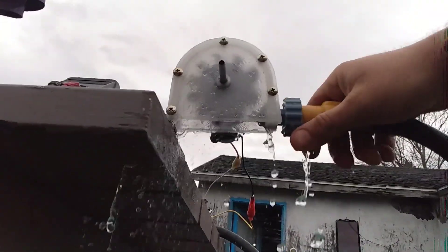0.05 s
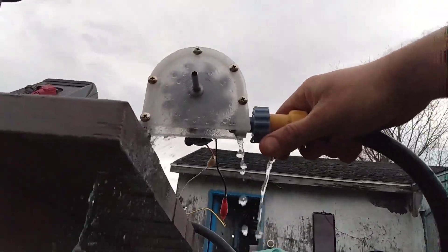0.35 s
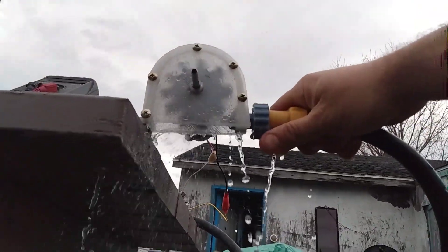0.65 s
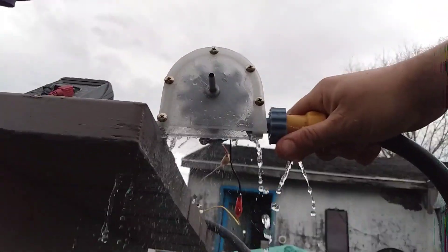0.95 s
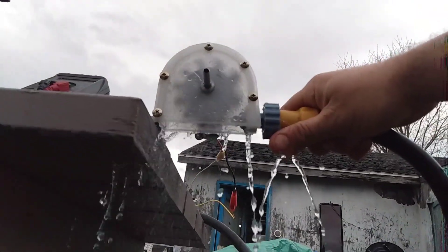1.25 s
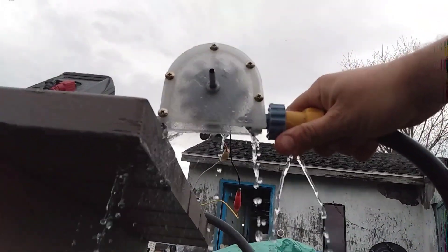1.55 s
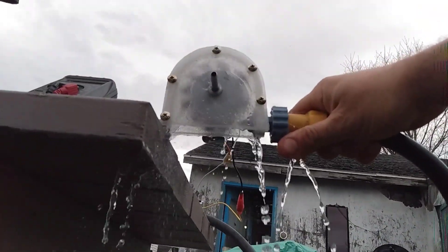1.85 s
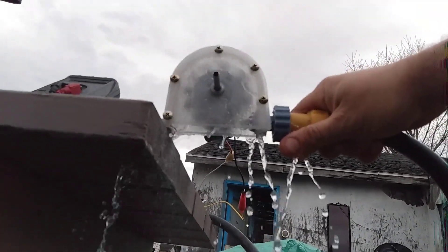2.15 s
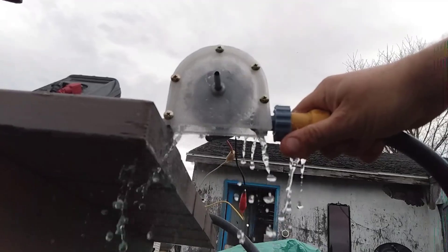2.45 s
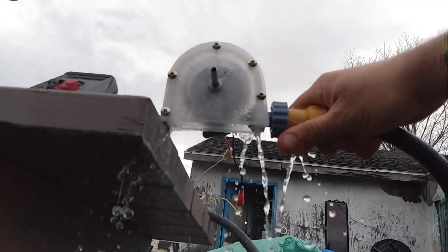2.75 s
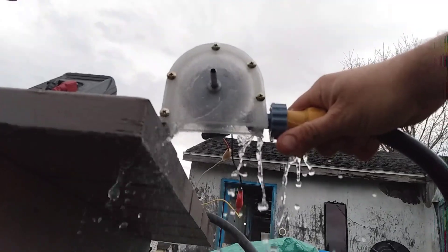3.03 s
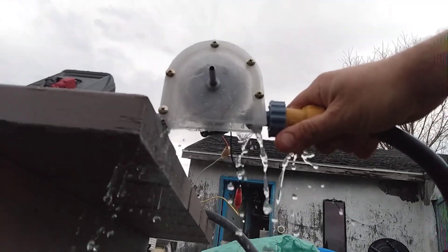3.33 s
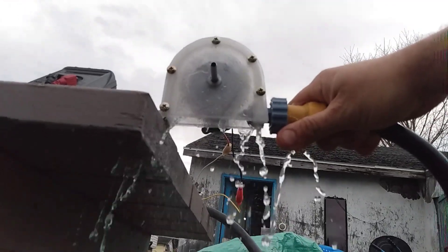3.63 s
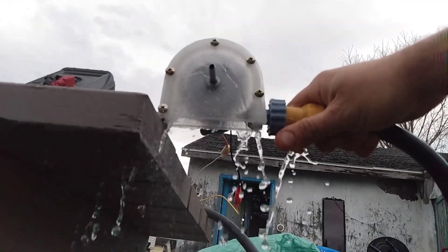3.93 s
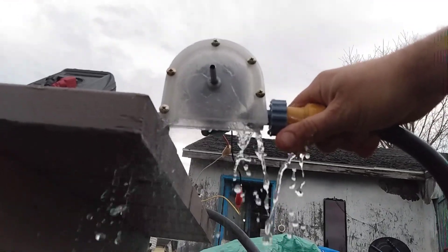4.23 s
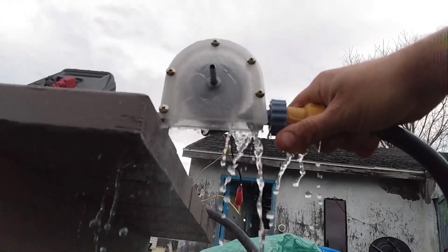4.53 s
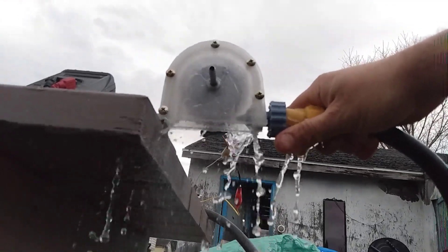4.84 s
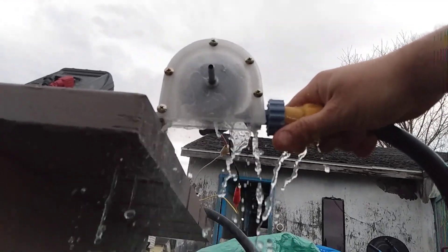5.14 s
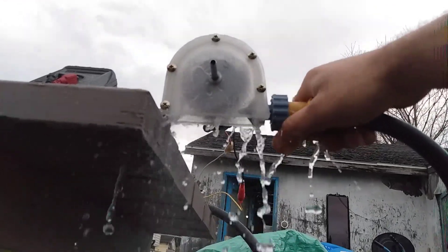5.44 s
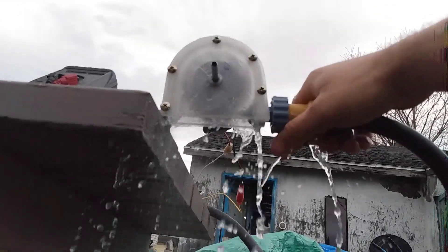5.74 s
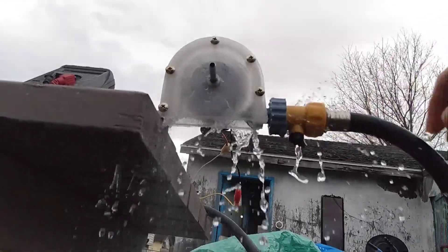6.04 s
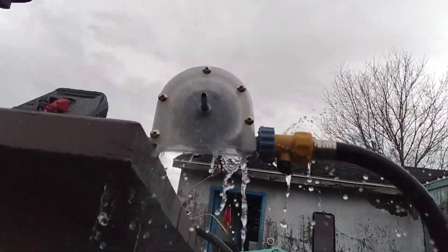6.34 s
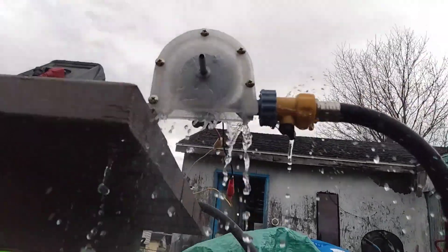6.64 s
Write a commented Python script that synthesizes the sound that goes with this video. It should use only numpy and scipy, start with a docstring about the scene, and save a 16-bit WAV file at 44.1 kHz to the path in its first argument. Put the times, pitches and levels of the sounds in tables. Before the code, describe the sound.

Water from a hose hisses inside a small plastic turbine, close to the microphone in the open air. The wheel chatters and scrapes against its housing, gathering speed in stages until it settles into a fast, whining rattle with a faint generator hum. The spray grows along with it, while scattered drops splat nearby and a few soft puffs of wind brush the microphone.

```python
"""A small water turbine in a plastic housing spins up on a hose jet, outdoors and close by.
Its loose rotor knocks once a turn, whirls through its critical speed, then rattles until the
housing's resonances sing near 1 kHz. The generator's brushes tick and its poles hum with the shaft.
Spray hisses inside, wind rumbles faintly, and spilled water spatters below."""
import sys
import numpy as np
from scipy import signal
from scipy.fft import rfft, irfft
from scipy.io import wavfile
from scipy.ndimage import uniform_filter1d

SR = 44100
rng = np.random.default_rng(int(sys.argv[2]) if len(sys.argv) > 2 else 0)


def pcm_store(signal):
    """Save signal as 16-bit PCM."""
    levels = np.round(np.clip(np.atleast_2d(signal), -1, 1) * 32767)
    wavfile.write(sys.argv[1], SR, levels.astype(np.int16).T)


N = 298998
TIME = np.arange(N) / SR

# Shaft speed. Each row: time in seconds, turns per second.
SHAFT_SPEED = [(0, 23.91), (.53, 23.62), (.75, 19.48), (1.16, 28.89), (1.52, 33.39), (1.8, 35.25),
               (2.3, 42.37), (2.57, 47.46), (2.95, 50.11), (3.9, 48.16), (4.18, 48.75), (4.61, 63.11),
               (6.21, 66.96), (6.78, 67.15)]
# Rotor wobble. Each row: turns per second, side blow, opposite blow and looseness, each from 0 to 1.
ROTOR_WOBBLE = [(25, 0.1, 0.11, 0.06), (33.5, 0.18, 0.09, .16), (41.5, 0, 0.13, .16),
                (49.1, 0.2, 0.28, 0.43), (54.2, 0, 0.4, .95), (63.7, .8, 0.72, .5),
                (67.13, 0.7, 0.97, 0.83)]
# Period doubling: at speed the wobble repeats every second turn. Each row: time in seconds, share.
PERIOD_DOUBLING = [(4.2, .05), (4.7, .9)]
# The rotor runs almost clear of the wall. Each row: centre and half length in seconds, knock gain in dB.
CLEAR_RUNS = [(.362, 0.013, -14), (.76, 0.073, -3), (.89, 0.029, -7.5), (2.48, .05, -3), (3.39, 0.028, -7),
              (3.6, .04, -1.5), (3.98, 0.046, -3), (4.22, .035, -4)]
# Resonances of the housing, dry cover, wheel and generator can.
# Each row: frequency in Hz, nominal width in Hz, relative levels left and right in dB.
HOUSING_MODES = [(358, 99, -21, -22.5), (560, 160, -22, -22.5), (782, 218, -14, -14.5), (941.6, 105, 2, 1),
                 (1037, 84, 0, -0.5), (1095.5, 105, -2.5, -2), (1319, 225, -16, -13.5),
                 (1632, 290, -16.5, -17.5), (1880, 360, -14.5, -29.5), (2544, 840, -24.5, -26)]
DRY_COVER_MODES = [(1133, 105, 3.7, 8.6)]
WHEEL_MODES = [(507, 300, -11.5, -19), (1270, 426, -0.5, -3), (1586, 270, -6.5, -22.5),
               (2015, 400, -0.5, -7), (2389, 260, 4, -6.5), (2693, 176, -1, -6), (3231, 550, -10.5, -9),
               (4600, 1730, -14.5, -14)]
CAN_MODES = [(4710, 47, -15, 4.4), (4930, 200, 4.5, 1.5), (5207, 186, -8, 6.1)]
# A water film damps the cover's ring. Each row: time in seconds, wet share.
COVER_WETNESS = [(1.9, 0.83), (2.6, 0.8), (4.1, 0.73), (4.6, 0.95)]
# Phase of the ringing parts. Each row: frequency in Hz, lead of left over right in radians.
LEFT_LEAD = [(150, -4), (500, 1.4), (1000, 0.7563), (1700, 0.81), (2100, 1.6), (2700, 0.07), (3200, 2.5),
             (5000, 1.85)]
# Radiation of the frame. Each row: frequency in Hz, gain in dB.
FRAME_RESPONSE = [(60, -37), (130, -21), (190, -6.5), (260, -10), (320, -2), (395, 2), (450, -1),
                  (530, -3.5), (680, -2), (790, 1.5), (950, -10)]
# Spectra of the spray and the wind. Each row: frequency in Hz, relative level in dB.
SPRAY_SPECTRUM = [(150, -28), (400, 11), (1500, 5.5), (3700, -2.5), (5600, -1.5), (6600, 2), (8300, 0.5),
                  (10000, 2.5), (11800, 3.5), (13200, -2), (14700, -0.5), (15800, -8)]
WIND_SPECTRUM = [(15, -18), (30, -6), (50, -4), (100, 0.5), (160, 0.5), (240, -7), (500, -3.5), (2000, -39)]
# Direction of the spray. Each row: frequency in Hz, left minus right in dB.
SPRAY_BALANCE = [(3000, -3.5), (5500, 5), (6800, 7.5), (8500, 0.5), (10000, -2), (12500, 8), (14000, 3.5),
                 (15500, 1)]
# Puffs of wind. Each row: centre in seconds, half length in seconds, level in dB.
WIND_PUFFS = [(.12, 0.14, -50), (.66, 0.14, -45), (1.38, 0.044, -46), (3.499, 0.064, -50), (3.9, 0.11, -53),
              (4.65, 0.13, -56), (6.55, 0.14, -61)]
# Large drops. Each row: start in seconds, relative peak in dB, ring in Hz, left minus right in dB.
LARGE_DROPS = [(0.031, -24, 7880, 1), (0.237, -25.5, 3980, -1), (.411, -25.5, 5000, -4),
               (1.134, -31, 6000, -3), (2.6643, -22, 9450, 0), (2.705, -22, 5160, 5), (3.654, -30, 7200, 4),
               (4.7421, -24, 5500, 0), (5.104, -19, 5560, 3), (5.2647, -17, 6260, 1),
               (5.406, -18, 10900, -4), (5.863, -20, 5270, 5), (6.0556, -21, 9000, 3),
               (6.194, -20, 4900, 0)]

CRUISE, CRITICAL, WHIRL_RANGE, BRUSH_CHATTER = 50, 42, 2.1, 29.5  # turns per second
ROCK_END_S = .55  # the rotor rocks until then
LOOSEN_S, LET_GO_S = (5.35, 5.85), (5.85, 6.1)  # the hand on the turbine loosens, then lets go
# Added to side blow, opposite blow and looseness while the rotor whirls or rocks.
WHIRL_WOBBLE, ROCK_WOBBLE = (0.22, 0.5, 0.13), (0.51, 0.1, 0.075)
# Gain laws. Each gives dB at cruise, per doubling of speed, added in the whirl, above it, once let go.
KNOCK_LAW = (-14.5, 7, -1, -5, -2)
SCRAPE_LAW = (-25.5, 7, 2.5, -3, 0)
TICK_LAW = (-33, 12.5, -2.5, -7, -.5)
WHIRR_LAW = (-48.5, 6.5, 3, 0, 0.5)
HUM_LAW = (-59, 8.5, 8, 0, -1)


def gain_of(db):
    """Amplitude ratio of a level in decibels."""
    return 10 ** (np.asarray(db) / 20)


def unit_rms(x):
    """Normalisation to an rms of 1."""
    return x / np.sqrt(np.mean(x ** 2) + 1e-20)


def smoothed(x, first, second):
    """Low-pass filtering by two moving averages, with lengths in samples."""
    return uniform_filter1d(uniform_filter1d(x, first), second)


def steadied(x):
    """Division by the running rms holds the slow level of a stereo sound at 1."""
    power = smoothed((x ** 2).mean(0), 6000, 3000)
    return x / np.sqrt(abs(power) + 1e-20)


def curves(rows, at=TIME):
    """Linear interpolation of each later column against the first."""
    axis, *columns = np.transpose(rows)
    return [np.interp(at, axis, column) for column in columns]


def ramp(x, ends):
    """Linear rise from 0 to 1 between two ends."""
    return np.clip((x - ends[0]) / (ends[1] - ends[0]), 0, 1)


def swells(rows):
    """A sum of Gaussian pulses."""
    return sum(height * np.exp(-((TIME - s) / half) ** 2) for s, half, height in rows)


def spectrum_at(points, hz):
    """Interpolation on a logarithmic frequency axis."""
    f, value = np.transpose(points)
    return np.interp(np.log(hz + 1), np.log(f + 1), value)


def coloured(x, points):
    """Zero-phase filtering by a spectrum in dB."""
    return irfft(rfft(x) * gain_of(spectrum_at(points, np.fft.rfftfreq(N, 1 / SR))), N)


def drift(hz):
    """Low-pass noise: a random fluctuation of rms 1, up to about hz."""
    rolloff = 1 + (np.fft.rfftfreq(N, 1 / SR) / hz) ** 4
    return unit_rms(irfft(rfft(rng.standard_normal(N)) / rolloff, N))


def clicks(s, size):
    """An impulse train with the given sizes at the times s."""
    at = np.round(s * SR).astype(int)
    inside = (at >= 0) & (at < N)
    return np.bincount(at[inside], size[inside], N)


def patter(per_s, spread_db):
    """A Poisson process of impacts, most small and a few large."""
    size = gain_of(spread_db * np.minimum(rng.exponential(1, N), 5)) * rng.choice([-1, 1], N)
    return size * (rng.random(N) < per_s / SR)


def ring(force, modes, steep, size=4096):
    """Resonance: a force drives the modes' minimum-phase response, shifted in phase on the right."""
    hz = abs(np.fft.fftfreq(size, 1 / SR))
    bins, margin = size // 2 + 1, size // 16
    power = sum(gain_of([[left], [right]]) ** 2 / (1 + (2 * (hz - f) / width) ** 2) ** steep
                for f, width, left, right in modes)
    log_magnitude = np.log(power + 1e-9) / 2
    response = np.exp(np.conj(signal.hilbert(log_magnitude)))[:, :bins]
    response[1] *= np.exp(-1j * spectrum_at(LEFT_LEAD, hz[:bins]))
    taps = np.roll(irfft(response), margin, axis=1)
    return signal.oaconvolve(force[None], taps, axes=1)[:, margin:][:, :N]


def reverberant(x, wet_db, t60, shared=0, size=8000):
    """Reflections from table and walls decay exponentially; a share is common to left and right."""
    t = np.arange(size) / SR
    taps = rng.standard_normal((3, size)) * (rng.random((3, size)) < .1)
    taps *= gain_of(-60 * t / t60) * (t > .002)
    taps = np.sqrt(shared) * taps[2] + np.sqrt(1 - shared) * taps[:2]
    taps /= np.linalg.norm(taps, axis=1, keepdims=True)
    return x + gain_of(wet_db) * signal.oaconvolve(x, taps, axes=1)[:, :N]


def shaft_speed(t=TIME):
    """Rotation frequency in turns per second."""
    return curves(SHAFT_SPEED, t)[0]


def passes(turns, angle):
    """Rotation brings the shaft past an angle, given in turns, at these times."""
    return np.interp(np.arange(int(turns[-1])) + angle, turns, TIME)


def whirling(speed):
    """Shaft resonance: the whirl, from 0 to 1, peaks at the critical speed."""
    return 1 / (1 + ((speed - CRITICAL) / WHIRL_RANGE) ** 8)


def law_db(law):
    """A power law of speed, offset by the whirl, self-centring above it and the hand's release."""
    cruise_db, slope_db, whirl_db, centred_db, free_db = law
    speed = shaft_speed()
    centred = ramp(speed - CRITICAL - WHIRL_RANGE, (-.5, .5))
    return (cruise_db + slope_db * np.log2(speed / CRUISE) + whirl_db * whirling(speed)
            + centred_db * centred + free_db * ramp(TIME, LET_GO_S))


def wobble(t):
    """Speed, whirl and early rocking add up to set the side blow, opposite blow and looseness."""
    speed = shaft_speed(t)
    whirl = np.outer(WHIRL_WOBBLE, whirling(speed))
    rocking = np.outer(ROCK_WOBBLE, t < ROCK_END_S)
    return np.array(curves(ROTOR_WOBBLE, speed)) + whirl + rocking


def rotor_blows(turns):
    """Impact and rebound at up to three angles a turn; looseness scatters their timing and force."""
    out = np.zeros((3, N))
    for k, angle in enumerate([0, .75, .59]):  # main, side and opposite blow
        s = passes(turns, angle)
        side, opposite, loose = wobble(s)
        time_jitter, force_jitter, gap_jitter, rebound_jitter = rng.standard_normal((4, len(s)))
        alternation = curves(PERIOD_DOUBLING, s)[0] * (-1) ** np.arange(len(s))
        s = s + 0.00157 * loose * time_jitter + .0009 * alternation
        size = [1, side, opposite][k] * gain_of((1 + 1.33 * loose) * force_jitter + 0.5 * alternation)
        rebound_s = .0052 + (0.00029 + .001 * loose) * gap_jitter
        out[k] = clicks(s, size) + clicks(s + rebound_s, 0.56 * size * gain_of(2.6 * rebound_jitter))
    return out


def housing_knocks(impacts):
    """Impacts excite the housing's modes; a water film damps the cover's mode."""
    wet = curves(COVER_WETNESS)[0]
    damped = ring(impacts * wet, HOUSING_MODES, steep=2.44)
    undamped = ring(impacts * (1 - wet), HOUSING_MODES + DRY_COVER_MODES, steep=2.42)
    return steadied(damped + undamped)


def wheel_scrape(impacts, side):
    """Friction: the wet wheel rubs the wall, hardest around each blow, and rings in its own modes."""
    contact = unit_rms(smoothed(abs(impacts), 480, 300))
    grit = unit_rms(patter(per_s=4000, spread_db=3.43)) * (0.17 + contact)
    glancing = unit_rms(impacts + 0.83 * side)  # side blows sound harder and brighter
    return steadied(ring(unit_rms(grit) + 0.36 * glancing, WHEEL_MODES, steep=2.64))


def rotor_rattle(turns):
    """Intermittent contact: the loose rotor's impacts drive both the knocking and the scraping."""
    lull_db, uneven_db = swells(CLEAR_RUNS), 1.13 * drift(2)
    knock_db = law_db(KNOCK_LAW) + lull_db + uneven_db
    scrape_db = law_db(SCRAPE_LAW) + 0.48 * lull_db + uneven_db - 1.5 * (TIME < ROCK_END_S)
    main, side, opposite = rotor_blows(turns)
    looseness = wobble(TIME)[2]
    impacts = main + side + opposite + 0.38 * looseness * patter(per_s=260, spread_db=2.83)
    knocks = gain_of(knock_db) * housing_knocks(impacts)
    scrape = gain_of(scrape_db) * wheel_scrape(impacts, side)
    return (reverberant(knocks, wet_db=-16, t60=.08, shared=.7)
            + reverberant(scrape, wet_db=-10, t60=.06, shared=.3))


def brush_ticks(turns):
    """Sliding contact: the brushes scratch six times a turn, unevenly, and ring the metal can."""
    ticks = np.zeros(N)
    for k, strength in enumerate([1.0, 0.39, 0.86, 0.038, 0.4, 0.58]):
        s = passes(turns, k / 6)
        ticks += clicks(s, strength * gain_of(4.8 * rng.standard_normal(len(s))))
    scratch = smoothed(ticks, 90, 60) * rng.standard_normal(N)
    can = ring(unit_rms(ticks) + unit_rms(scratch), CAN_MODES, steep=1.32)
    gliding = 1 - ramp(shaft_speed() - BRUSH_CHATTER, (-1, 1))  # slow brushes bear smoothly
    tick_db = law_db(TICK_LAW) - 4.5 * gliding + 1.25 * drift(5)
    return gain_of(tick_db) * steadied(reverberant(can, wet_db=-8.5, t60=0.084))


def frame_whirr(turns):
    """Forced vibration: imbalance shakes the frame at shaft harmonics; doubling adds half orders."""
    speed, doubling = shaft_speed(), curves(PERIOD_DOUBLING)[0]
    out = np.zeros(N)
    for order in np.setdiff1d(np.arange(4, 41) / 2, [3, 6]):  # orders 3 and 6 belong to the poles
        waver_db = 2.6 * np.interp(TIME, np.linspace(0, TIME[-1], 50), rng.standard_normal(50))
        share = 0.52 * doubling if order % 1 else 1
        amplitude = share * gain_of(spectrum_at(FRAME_RESPONSE, order * speed) + waver_db)
        out += amplitude * np.sin(2 * np.pi * (order * turns + rng.random()))
    return gain_of(law_db(WHIRR_LAW)) * out


def pole_hum(turns):
    """Periodic forcing by three poles a turn; the octave swells at the frame's resonance."""
    phase = 2 * np.pi * 3 * turns
    undamped = ramp(TIME, LOOSEN_S)  # a loose grip no longer damps the hum
    fundamental = gain_of(12 * undamped + 1.9 * drift(5)) * np.sin(phase)
    sideband = .45 * curves(PERIOD_DOUBLING)[0] * np.sin(2 * phase - np.pi * turns)
    radiation = 4 * gain_of(spectrum_at(FRAME_RESPONSE, 6 * shaft_speed()))
    octave = radiation * gain_of(4 * undamped + 1.6 * drift(2.6)) * (np.sin(2 * phase) + sideband)
    return gain_of(law_db(HUM_LAW)) * (fundamental + octave)


def droplets():
    """Tiny splats are damped sinusoids of a few cycles, scattered in pitch and from left to right."""
    out, t = np.zeros((2, N)), np.arange(200) / SR
    for hz in np.geomspace(3600, 12000, 12):
        splat = np.sin(2 * np.pi * hz * t) * np.exp(-hz * t / 1.5) * np.sqrt(hz)
        hits = patter(per_s=hz / 22, spread_db=3.6) * (.6 + rng.uniform(-1, 1, (2, N)))
        out += signal.oaconvolve(hits, splat[None], axes=1)[:, :N]
    return unit_rms(reverberant(out, wet_db=-0.5, t60=0.03))


def jet_db(cruise_db=-33, db_per_doubling=6, lag_s=0.39):
    """Inertia: the wheel lags the jet, so the spray is louder while the shaft gathers speed."""
    speed = shaft_speed()
    acceleration = uniform_filter1d(np.maximum(np.gradient(speed, TIME), 0), size=5000)
    flow = speed + lag_s * acceleration
    return cruise_db + db_per_doubling * np.log2(flow / CRUISE)


def spray(turns):
    """Atomisation: the jet bursts on the cups into mist and droplets, pulsing a little each turn."""
    mist = unit_rms(rng.standard_normal((2, N)))
    surge_db = 0.89 * drift(23) + 0.41 * drift(9.9) + np.cos(2 * np.pi * turns)
    left, right = (mist + 0.63 * droplets()) * gain_of(surge_db)
    half_balance = np.array(SPRAY_BALANCE) * [1, .5]
    panned = np.array([coloured(left, half_balance), coloured(right, half_balance * [1, -1])])
    return gain_of(jet_db()) * unit_rms(coloured(panned, SPRAY_SPECTRUM))


def wind(rumble_db=-49.5, buffet_hz=(38, 85)):
    """Turbulence: a low rumble mostly common to both sides, and puffs that buffet them unequally."""
    air = rng.standard_normal(N) + 0.18 * rng.standard_normal((2, N))
    eddies = rng.standard_normal(N) + 0.64 * rng.standard_normal((2, N))
    buffet = signal.sosfilt(signal.butter(2, buffet_hz, "band", fs=SR, output="sos"), eddies)
    puffs = swells([(s, half, gain_of(db)) for s, half, db in WIND_PUFFS])
    return gain_of(rumble_db) * unit_rms(coloured(air, WIND_SPECTRUM)) + puffs * unit_rms(buffet)


def large_drops(size=900):
    """Impact noise: each drop landing nearby is a decaying burst, strongest around its ring frequency."""
    out, t = np.zeros((2, N)), np.arange(size) / SR
    for s, db, hz, pan_db in LARGE_DROPS:
        burst = rng.standard_normal((2, size)) * np.exp(-t / 0.0047)
        band = signal.butter(2, [hz * 0.7, hz * 1.31], "band", fs=SR, output="sos")
        splat = signal.sosfilt(band, burst) + 0.055 * burst
        gains = gain_of(db + 5 + np.array([[pan_db], [-pan_db]]) / 2)
        start = round(s * SR)
        out[:, start:start + size] += gains * splat / abs(splat).max()
    return out


def scene():
    """Superposition of turbine, water and wind; let go, the turbine shifts a little to the left."""
    turns = np.cumsum(shaft_speed()) / SR - .58  # zero at the first main blow
    balance_db = curves([(5.6, 0.18), (6.6, 1.2)])[0]
    pan = gain_of(np.array([balance_db, -balance_db]) / 2)
    turbine = rotor_rattle(turns) + brush_ticks(turns) + frame_whirr(turns) + pole_hum(turns)
    return pan * turbine + spray(turns) + large_drops() + wind()


def record(dry, ceiling=0.67, cutoff_hz=15850):
    """Soft saturation rounds the highest peaks, and a low-pass filter limits the band."""
    rounded = ceiling * np.tanh(dry / ceiling)
    lowpass = signal.firwin(511, cutoff_hz, window=("kaiser", 9), fs=SR)
    return signal.oaconvolve(rounded, lowpass[None], "same")


dry = scene()
out = record(dry)
pcm_store(out)
```